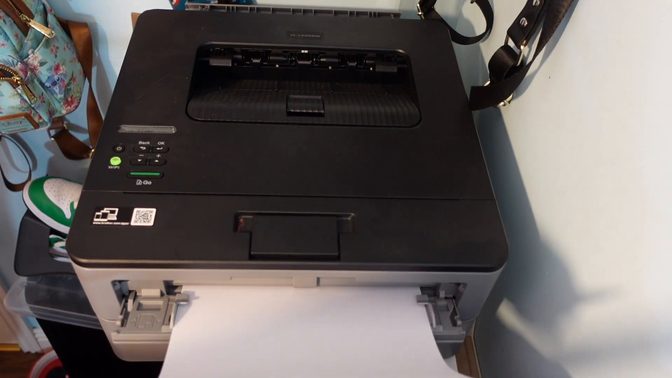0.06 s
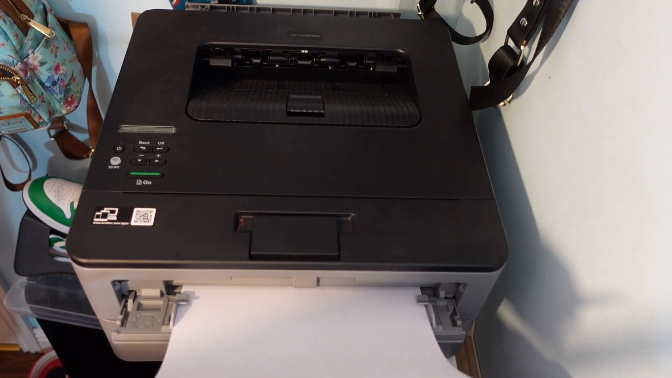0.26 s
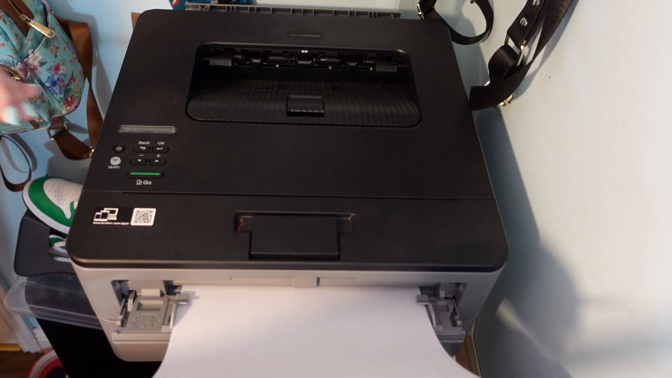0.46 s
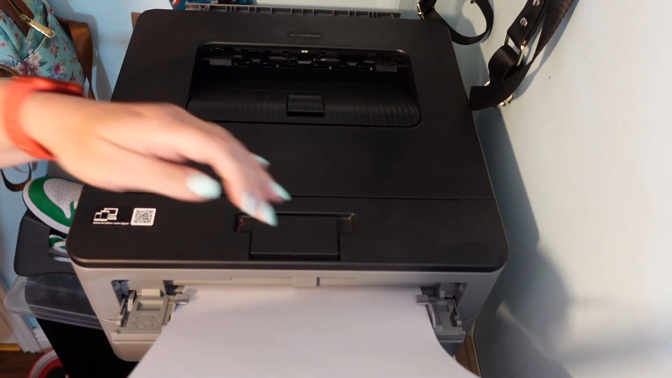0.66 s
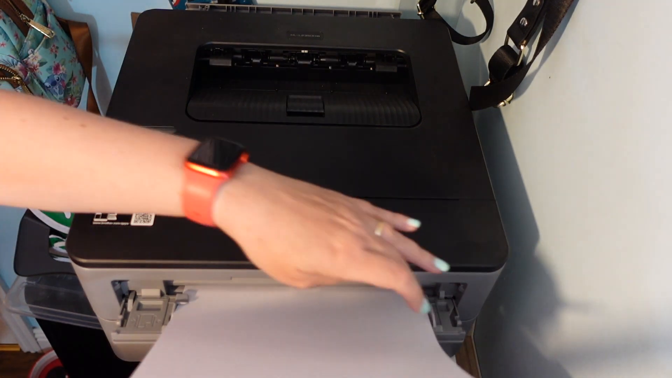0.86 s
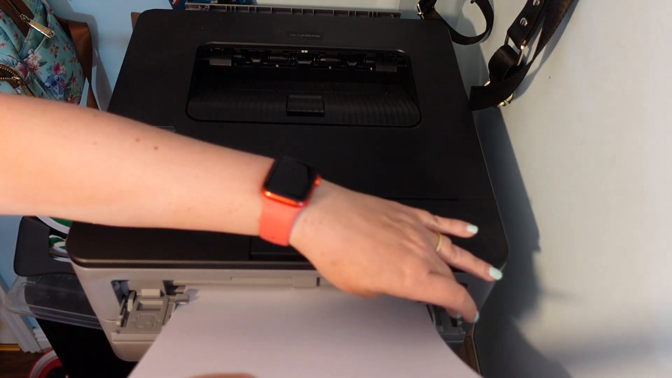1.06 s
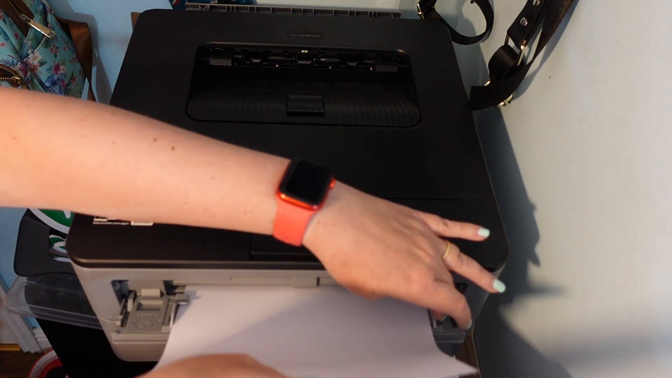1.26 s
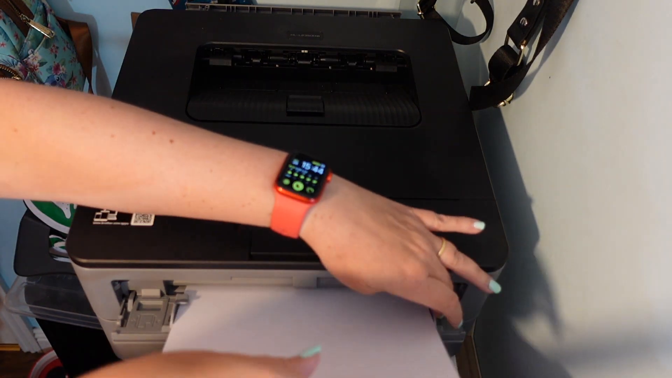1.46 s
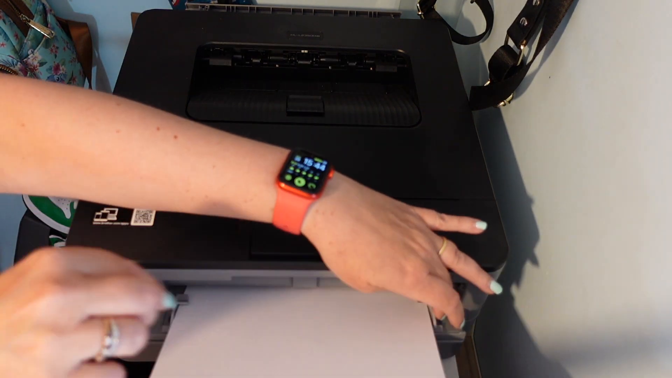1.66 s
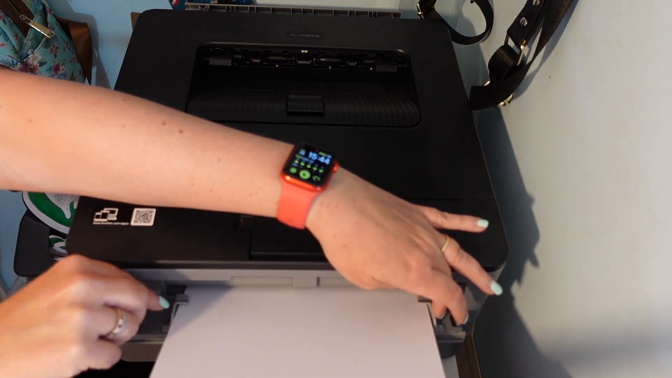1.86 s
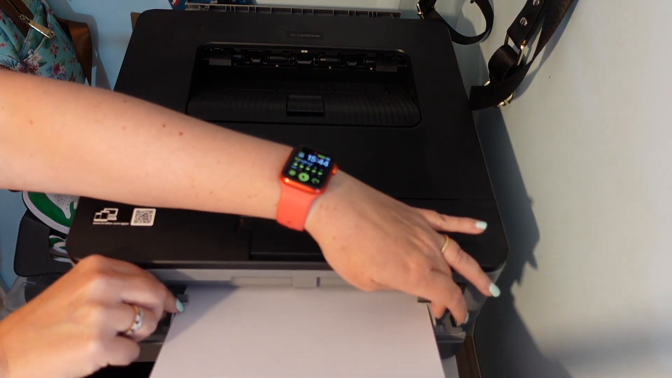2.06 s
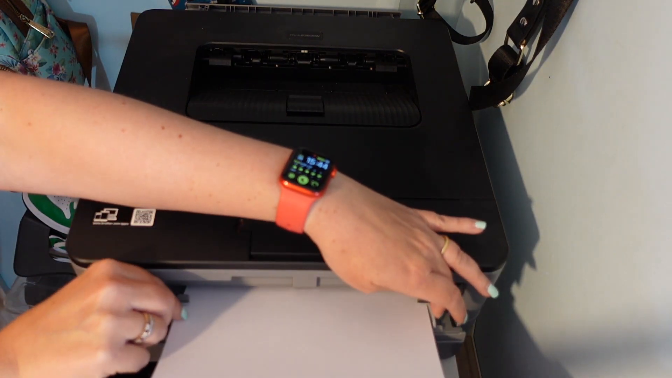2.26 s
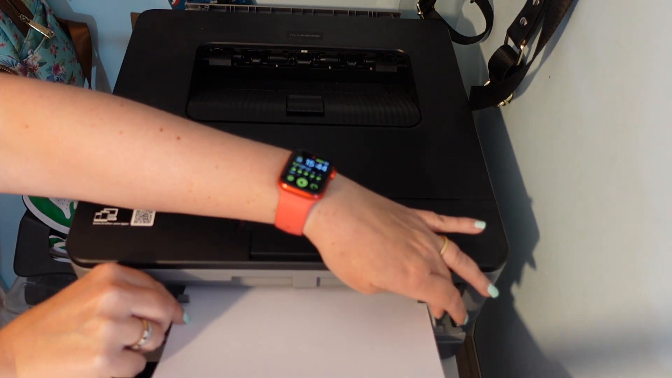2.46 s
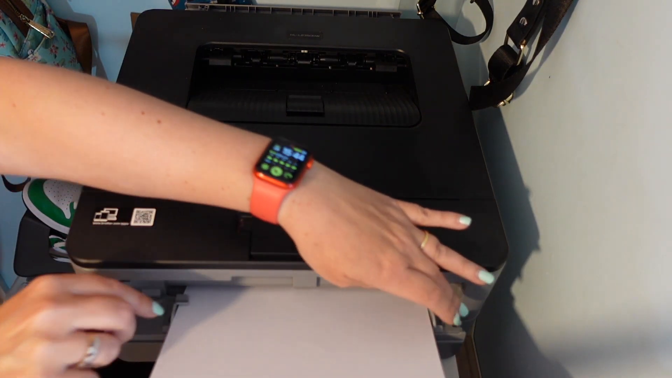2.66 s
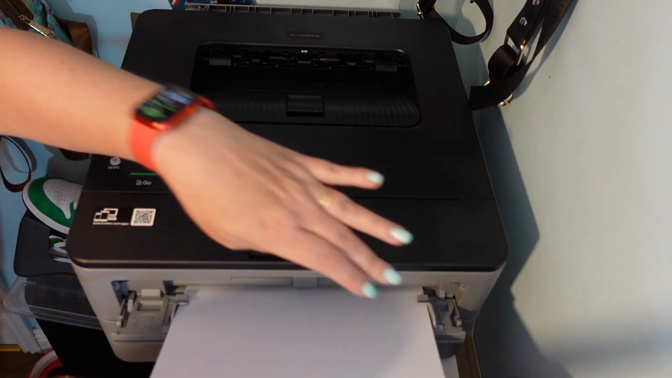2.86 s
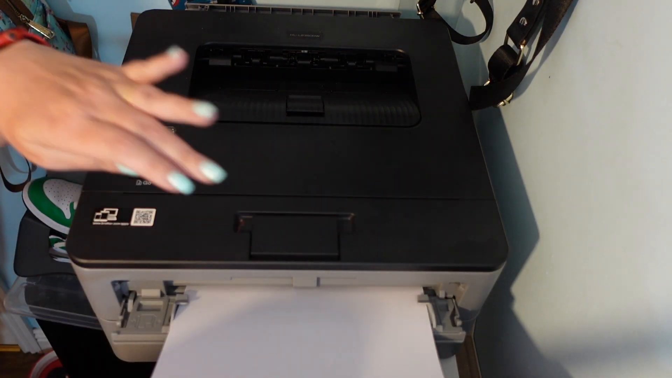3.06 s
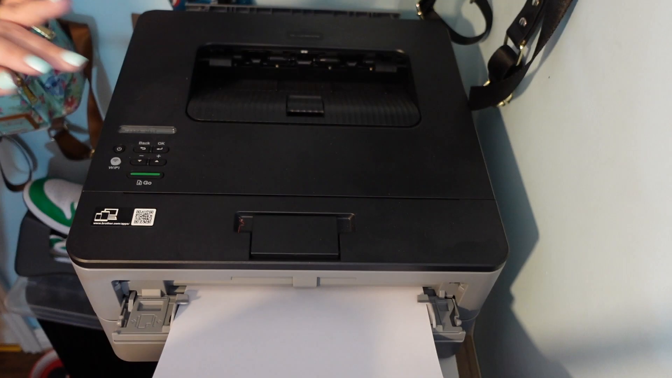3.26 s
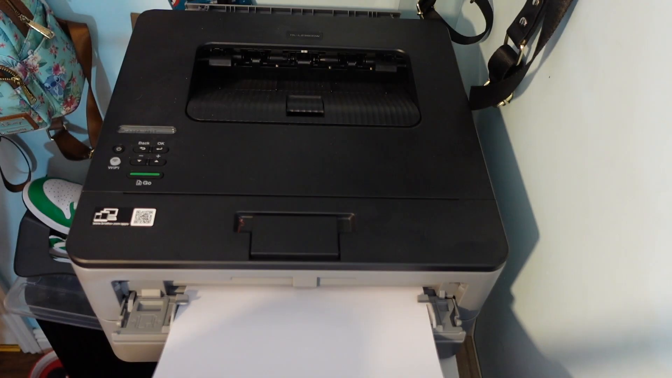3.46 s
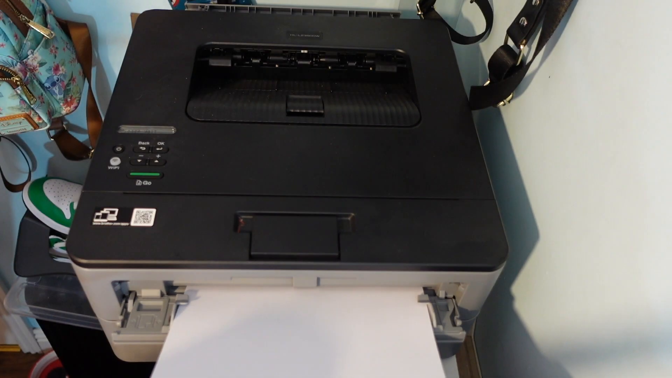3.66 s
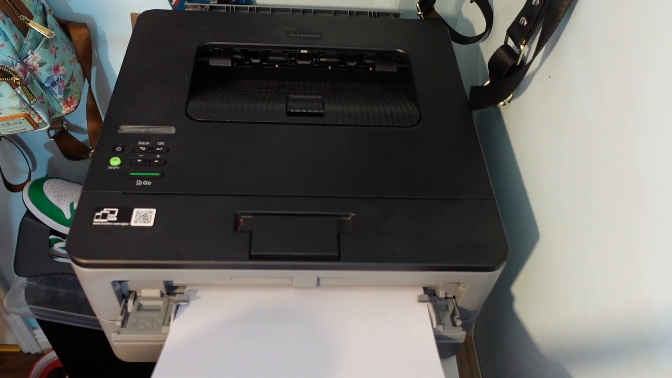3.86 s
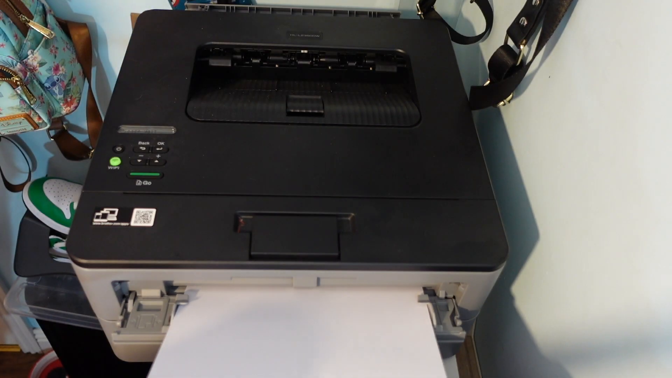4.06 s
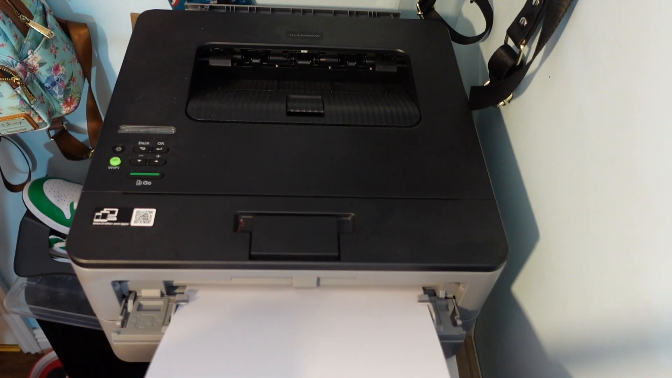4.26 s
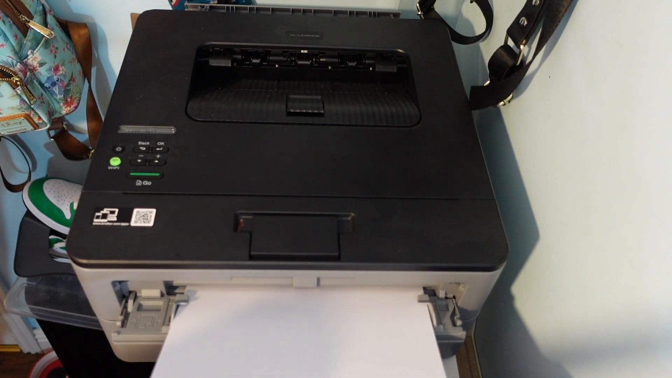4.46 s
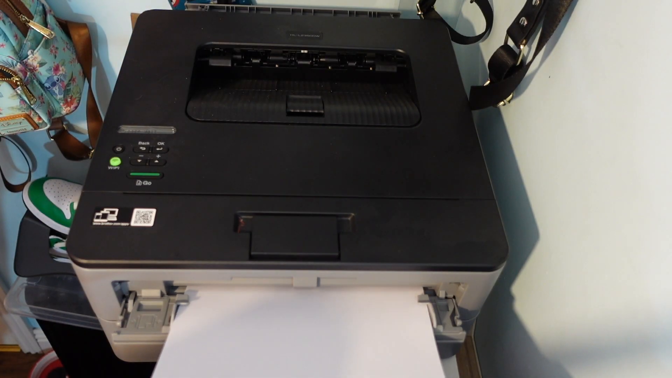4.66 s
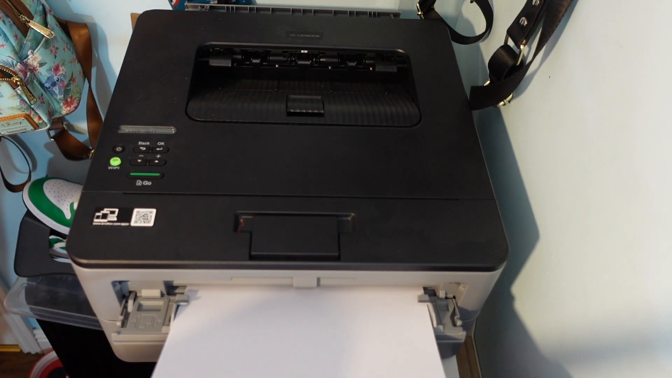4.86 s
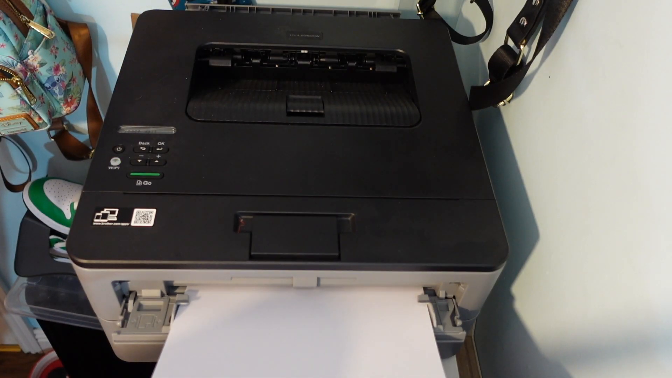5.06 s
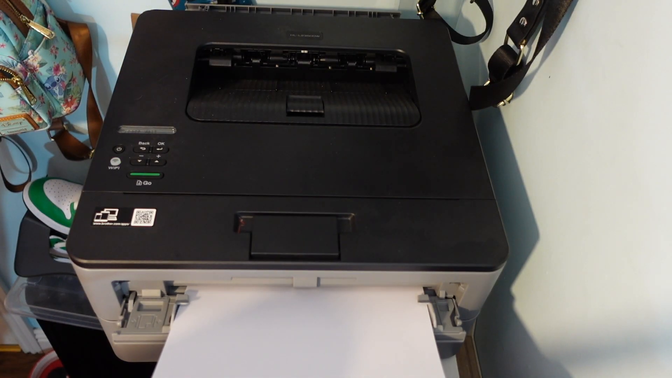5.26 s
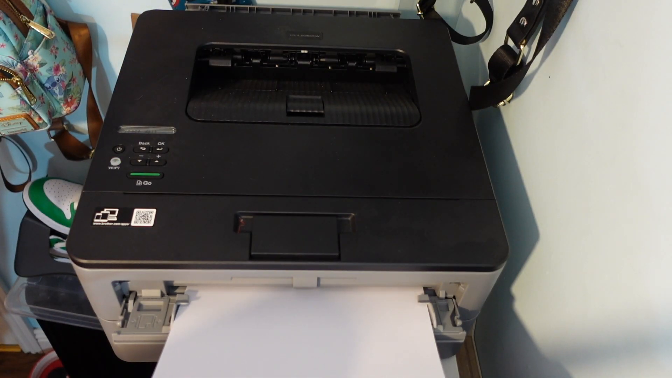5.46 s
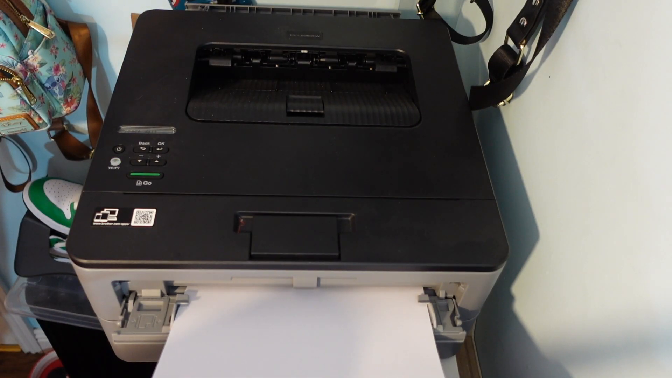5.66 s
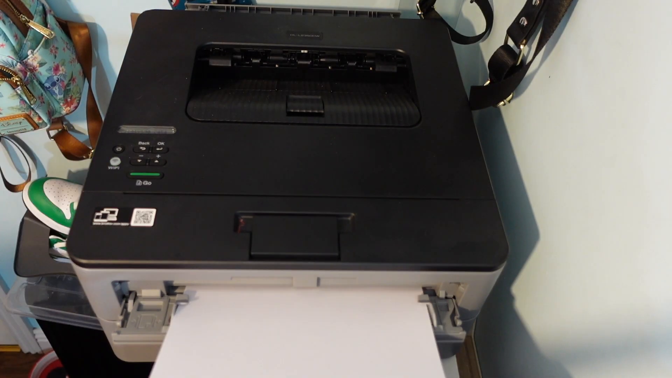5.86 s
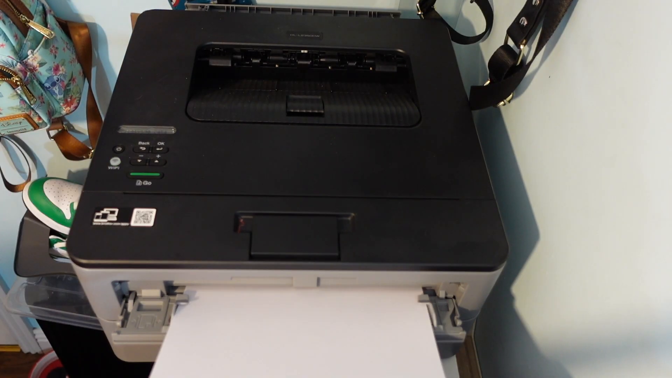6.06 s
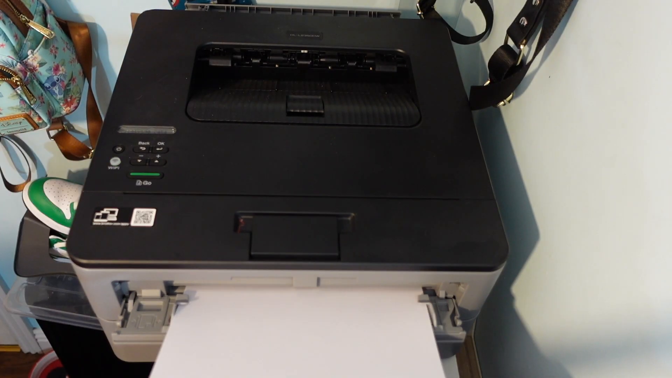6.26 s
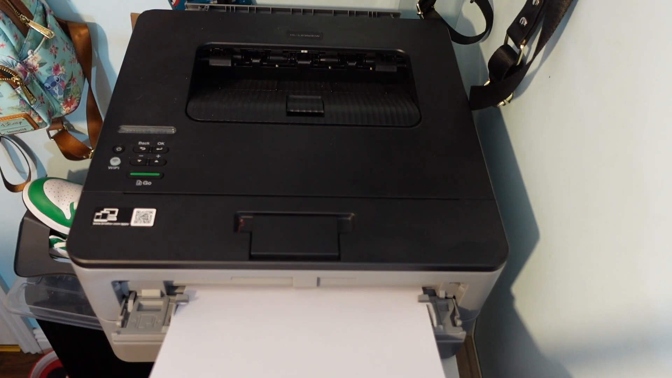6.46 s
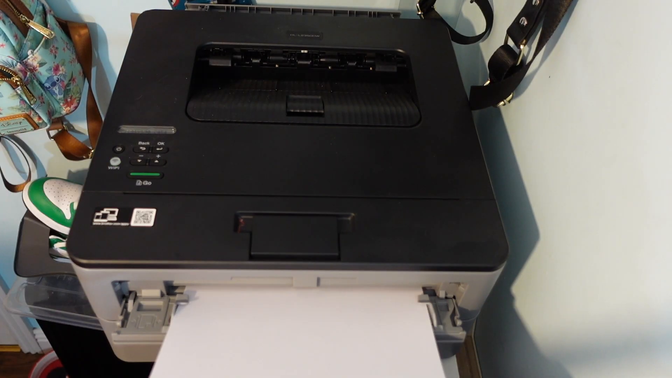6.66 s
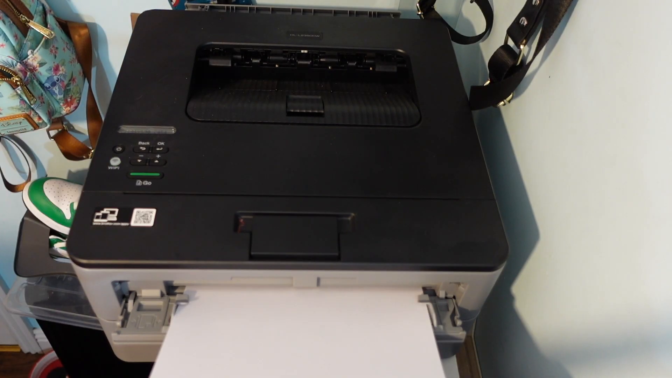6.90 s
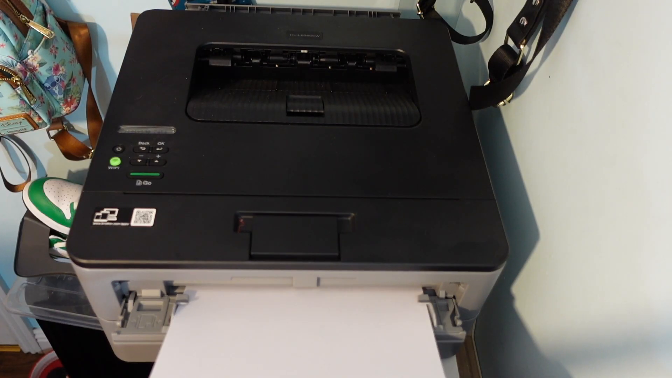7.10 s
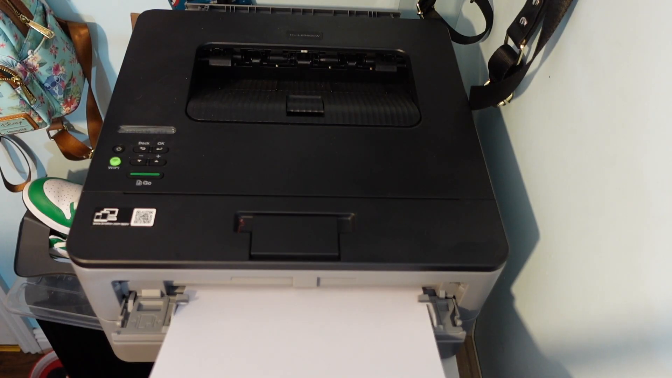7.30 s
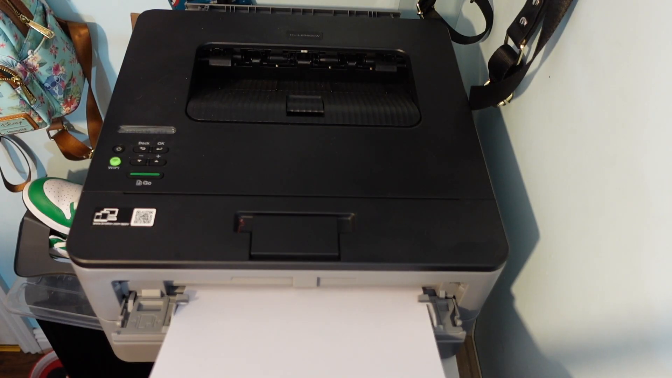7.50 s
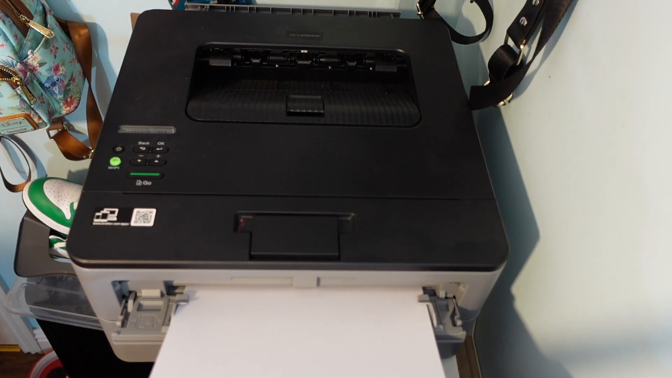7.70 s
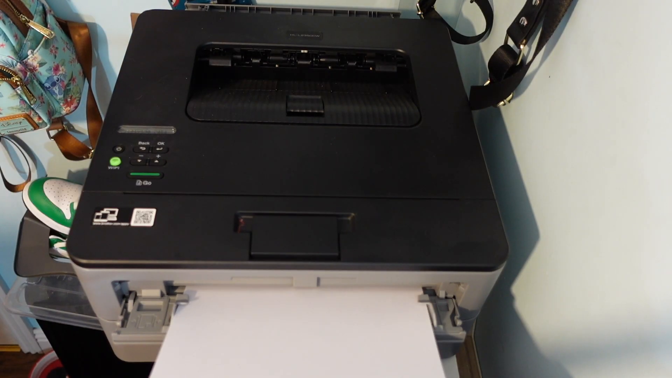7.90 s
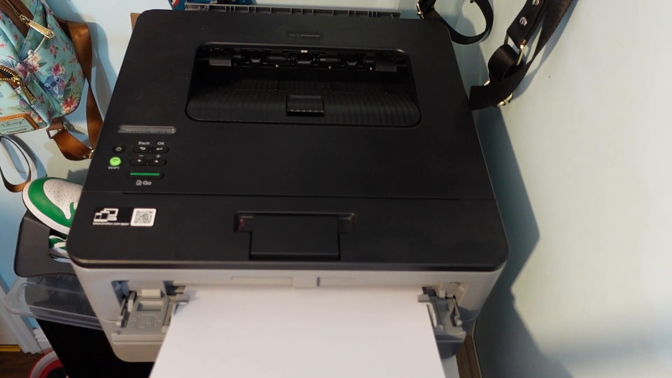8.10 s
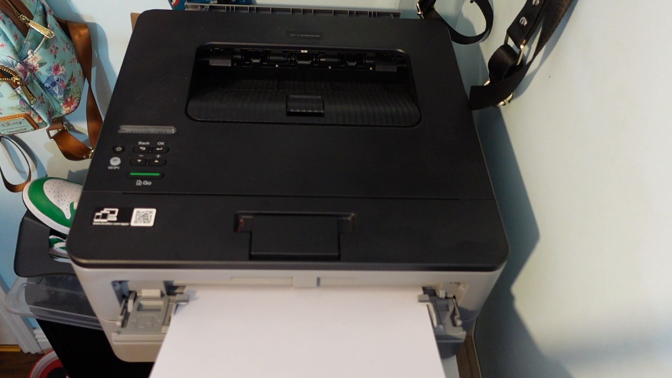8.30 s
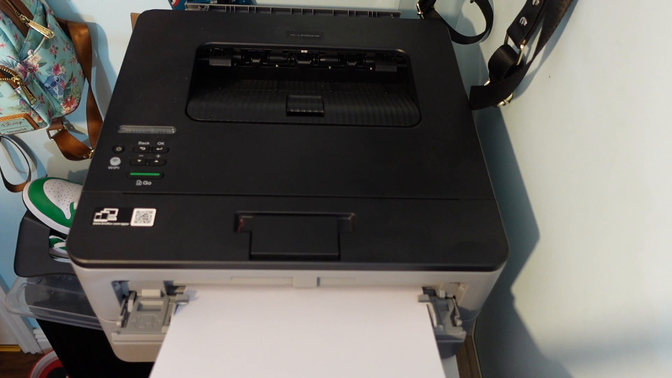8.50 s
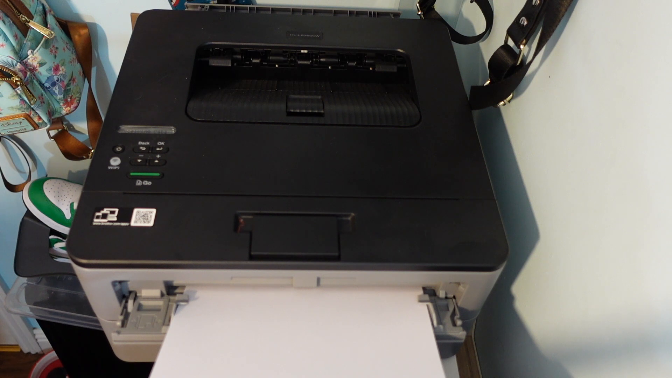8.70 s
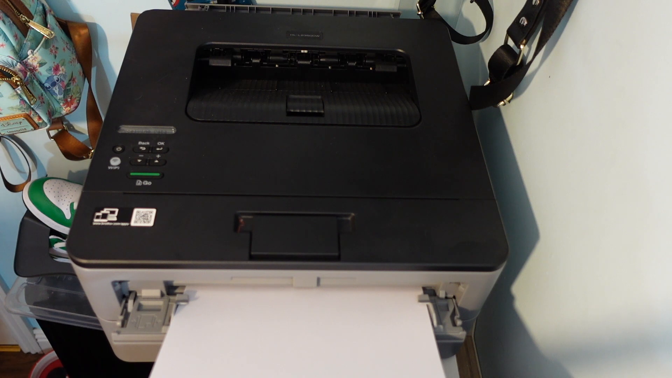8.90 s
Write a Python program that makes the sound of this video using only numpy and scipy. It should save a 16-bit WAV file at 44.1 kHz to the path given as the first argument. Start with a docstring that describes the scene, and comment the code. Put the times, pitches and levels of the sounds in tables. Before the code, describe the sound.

Hard knocks, paper scuffs and plastic clicks at a small printer, then a pause, then gears churn and a whine sweeps up and holds.

```python
"""Loading and starting a printer

Hands push a sheet into the manual feed slot of a desktop laser printer in a small room: knocks and clicks
ring in hard parts, and grainy noise makes the scuffs. A faint drone passes far away, probably an engine gaining
speed: noise, then climbing harmonics. The arm draws back with a soft rustle of filtered noise. Then the printer
starts: gears churn as ticks and hums, the motor drive sizzles as noise in narrow bands, and the mirror scanner
sweeps up to a steady whine made of sines."""
import sys
import numpy as np
from scipy import signal
from scipy.fft import rfft, irfft, next_fast_len
from scipy.io import wavfile

SR = 44100
rng = np.random.default_rng(int(sys.argv[2]) if len(sys.argv) > 2 else 0)


def generate_wav(sig):
    """Save sig (samples, or channels by samples) to the path in sys.argv[1] as 16-bit PCM at SR."""
    pcm = np.round(np.clip(np.atleast_2d(sig).T, -1, 1) * 32767).astype(np.int16)
    wavfile.write(sys.argv[1], SR, pcm)


N = 394254
TIME = np.arange(N) / SR

# Colours of steady sounds, each a curve of (frequency [Hz], relative level per Hz [dB]).
# The quiet room:
ROOM_TONE_COLOUR = [(18, -59), (30, -49), (69, -34), (90, -18), (341, -7.5), (709, -3), (852, -1),
                    (921, -9), (1140, -5), (1550, 0.5), (1720, -5.5), (2130, -8), (2300, -7.5),
                    (4660, -13.5), (15500, -22)]
# The far drone:
DRONE_COLOUR = [(150, -20.5), (300, -13.5), (650, 2.5), (1500, -1.5), (2500, -5.5), (5000, -18)]
# Plastic that is struck or rubbed:
PLASTIC_COLOUR = [(71, -65), (120, -44.5), (415, -9), (676, -9.5), (1020, -9.5), (2110, -2), (3240, -7),
                  (4300, -6.5), (4570, -7.5), (6330, -11), (7160, -16), (7760, -10.5), (8250, -15.5),
                  (15500, -28)]
# Sliding paper:
PAPER_COLOUR = [(180, -58), (300, -30.5), (849, 3.5), (937, -13), (1180, -2), (1510, -2.5), (2070, -3.5),
                (5300, -3), (6570, -21), (7620, -12), (15500, -26)]
# Ticking gear teeth:
GEAR_COLOUR = [(35, -102), (60, -57), (242, -13.5), (291, -9.5), (385, -1), (464, -12), (533, -1.5),
               (627, -7.5), (1260, -2), (1420, -5.5), (2910, -7.5), (3120, -11.5), (6120, -13.5),
               (6560, -17), (15500, -39)]
# Rollers and moving air:
ROLLER_COLOUR = [(88, -64), (150, -40.5), (302, -9.5), (428, -16.5), (519, -3.5), (827, -12.5), (1290, -10),
                 (1870, -8.5), (2060, -7), (2410, -10.5), (4140, -13), (7000, -21), (8330, -22),
                 (8830, -20.5), (15500, -47)]

# Room echo: time to die away by 60 dB.
ROOM_T60_S = 0.46
# Quiet room: the part shared by both microphones, and the part that differs between them.
ROOM_TONE_DB, ROOM_TONE_SIDE_DB = -67.5, -71.0
# Microphone pair: (frequency [Hz], left minus right [dB])
MICROPHONE_LEAN = [(100, 1.5), (400, 0), (1000, 0), (2000, -1.65), (4000, -1), (8000, -2), (12000, 1)]
# Nothing much is heard above this.
CUTOFF_HZ = 15900

# The far drone is loudest at its nearest and has lost 3 dB one passing time from there.
DRONE_DB, NEAREST_S, PASSING_S, DRONE_PATCHY_DB = -64, 2.3, 3.1, 3.5

# Sheet and fingers scuffing over the tray: (peak time [s], level [dB], fall time [s], treble change [dB],
# pitch of the rubbed part [Hz], its resonance [dB])
SCUFF_STROKES = [(0.013, -49.5, 0.069, -3, 2660, -23), (0.581, -47, 0.057, 3, 1600, -11),
                 (0.627, -38.5, 0.026, -22, 1130, -4), (0.715, -55, 0.019, -14, 1340, 0),
                 (1.05, -47.5, 0.15, -8, 2060, -17), (1.13, -39.5, 0.024, -22, 1850, 1),
                 (1.15, -46, 0.014, -18, 2790, 6.5), (1.17, -47, 0.015, -18, 1260, 2.5),
                 (1.264, -39.5, 0.014, -11, 1355, 1), (1.336, -45.5, 0.011, -16, 2320, -8),
                 (1.425, -44.5, 0.032, -14, 2310, -14), (2.07, -65.5, 0.11, 12, 4500, -8),
                 (2.568, -48.5, 0.044, 1.5, 2320, -11), (2.72, -75.5, 0.21, 12.5, 6650, -7),
                 (3.025, -67, 0.092, 11.5, 4500, -18)]
# Unevenness of the grip; share by which the pitch wanders; rise time as a share of the fall time.
SCUFF_CATCH_DB, SCUFF_WANDER, SCUFF_RISE_SHARE = 2.5, .03, 0.32

# Two knocks on something hard that rings: (time [s], level [dB], share of the full ring time [-])
KNOCK_HITS = [(0.0213, -26, 0.84), (0.0839, -30.5, 0.58)]
# What they ring with: (pitch [Hz], level [dB], full time to fall by 60 dB [s])
KNOCK_RINGS = [(350, -22, .05), (535, -12, .26), (710, -9, .035), (930, -9, .04), (1174, -5, .04),
               (1350, -6, .04), (1550, -10, .045), (2340, -15, .07), (2730, -6, .085), (2820, -16, .05),
               (3707, -19, .04), (4600, -14, .035)]
# Rings from this pitch up are started by the clack, lower ones by the thud.
CLACK_ABOVE_HZ = 2000

# Contacts on the plastic tray and casing, in uneven clusters: (time [s], relative level [dB], bass change [dB],
# treble change [dB], pitch of the struck part [Hz], its ring [dB], bounces, 0 or 1 [count])
CONTACTS = [(0.566, -36, -5, -1, 1590, -24, 0), (0.622, -33, -3, -10, 2500, -12, 0),
            (0.645, -32.5, -2, -7, 2390, -13, 0), (0.673, -38, 2, -3, 1090, -12, 0),
            (1.122, -28, -5, -6, 2050, -10, 0), (1.149, -31, -15, -3, 2810, -10, 0),
            (1.2162, -25.5, -1, -3, 1190, -25, 0), (1.262, -30, -8, -4, 1260, -13, 0),
            (1.276, -25.5, -17, -1, 1400, -17, 0), (1.297, -27.5, -4, 2.5, 2340, -15, 0),
            (1.530, -32, 3.5, 5.5, 2310, -20, 0), (1.559, -30, 3, 1, 2110, -18, 0),
            (1.578, -19, 0, 10, 4270, -26, 0), (1.584, -22.5, 8.5, 7.5, 2720, -18, 0),
            (1.592, -18, 5, -2, 1860, -12, 0), (1.612, -28, 4, 1, 1530, -18, 0),
            (1.6427, -28.5, -5, 3, 2940, -15, 0), (1.647, -33, -1, 6.5, 3640, -20, 0),
            (1.663, -28, -4, -1, 2440, -18, 0), (1.673, -26.5, 1, 1.5, 2110, -18, 1),
            (1.743, -41.5, -7, 2, 3650, -23, 0), (1.979, -25.5, -26, -3.5, 2420, -27, 0),
            (1.989, -29.5, -14, -4, 3420, -26, 0), (2.018, -32, 2.5, -10, 1156, -6.5, 1),
            (2.023, -35.5, 8.5, 2, 2100, -24, 0), (2.158, -31.5, -20, -6, 2310, -19, 0),
            (2.174, -29, -17, -12, 2340, -21, 0), (2.197, -35.5, 1, -3, 2260, -11, 0),
            (2.206, -41, -4, 2, 1800, -20, 0), (2.4976, -37.5, -8, 9.5, 3350, -10, 0),
            (2.504, -40, -10, 3, 3100, 1, 0), (2.508, -44.5, -6, -6, 1200, 5, 0),
            (2.564, -36, -14, -10, 2340, -7, 0), (2.571, -35.5, -12, -8, 2480, -2, 0),
            (2.585, -30.5, -5, 3, 4060, -13, 0), (2.600, -38, 4, 0, 1250, -9, 0),
            (2.627, -41, -1, 0, 1180, -12, 0), (2.650, -39, 1, 1, 1200, -12, 0),
            (3.056, -36, -4, 0.5, 1530, -12, 0), (3.086, -41, 2, 2, 2120, -22, 0),
            (3.567, -44.5, -8, -12, 1510, -8, 0), (4.432, -28.5, -5, 3, 1500, -10, 0),
            (4.436, -22.5, -4, -1.5, 3770, -14, 1), (4.464, -31, 1, -2, 2120, -11, 1),
            (4.504, -41.5, 6, 6.5, 3650, -18, 0), (4.529, -44, 2, 0, 2000, -20, 0),
            (7.019, -25, -3, 1.5, 1960, -18, 0), (7.025, -24.5, 1, -2, 2840, -26, 0),
            (7.033, -34.5, -6, 5, 1970, -18, 0)]
# The casing's long rings: (pitch [Hz], level [dB], time to fall by 60 dB [s])
CASING_RINGS = [(362, -35, 0.13), (486.6, -35, 0.14), (673, -26, 0.12), (1410, -20.5, 0.056),
                (1654, -23.5, 0.061), (2350, -33, 0.16), (2913, -17.5, 0.043), (3750, -24, 0.033),
                (7700, -37, .03)]
# A few contacts are followed by one much weaker bounce.
BOUNCE_S, BOUNCE_LOSS_DB = .0155, 11
# Rattle after each crack, and the ring of the struck part.
RATTLE_RISE_S, RATTLE_T60_S, PART_T60_S = 0.00046, 0.058, .045

# The sheet is pushed along the tray: (start [s], end [s], level it grows towards at the end [dB])
SHEET_SLIDES = [(0.567, 1.175, -50), (1.326, 1.598, -56), (2.053, 2.177, -63), (2.6, 2.7, -68)]
SLIDE_ATTACK_S, SLIDE_GROWTH_DB_PER_S, SLIDE_RELEASE_S = 0.06, 21.5, 0.11
# The sheet's own resonances: (pitch [Hz], width [Hz], relative level [dB])
SHEET_RESONANCES = [(797, 25, -13), (1260, 170, 3.5), (2240, 67, 7), (3600, 200, -3), (4650, 97, -1),
                    (5560, 95, 9.5), (7320, 180, -4)]
# They sink while the sheet goes into the slot (the rate is a share of their pitch per second).
SHEET_SINK_FROM_S, SHEET_SINK_S, SHEET_SINK_PER_S = .9, .25, .36

# Speed of the far engine: (time [s], firing rate [Hz])
ENGINE_SPEED = [(2.6, 121), (3.2, 117), (3.55, 128.5), (4.05, 139.5), (4.55, 146.5), (4.95, 150),
                (5.72, 154)]
# What reaches the room of its harmonics: (frequency [Hz], relative level [dB])
ENGINE_PATH = [(120, -49), (265, -12.5), (310, -16.5), (400, -25), (540, -5.5), (600, -9.5), (720, -8.5),
               (1050, -18.5), (1200, -9.5), (1300, 3), (1410, -24), (1510, -2.5), (1600, -8), (1640, 7.5),
               (1690, -15)]
# Harmonics that carry this far: (multiple of the firing rate [-], relative level [dB])
ENGINE_HARMONICS = [(2, -1), (4, 2), (5, -5), (6, -4), (8, 1), (9, -1.5), (10, -2.5), (11, -4), (12, -6),
                    (14, -3)]
# The engine fades in, pulls with wavering tones and lets go quickly.
ENGINE_DB, ENGINE_FROM_S, ENGINE_RISE_S, ENGINE_TO_S, ENGINE_FADE_S = -70.5, 2.5, 0.45, 5.82, 0.12
ENGINE_WAVER_DB, ENGINE_WAVER_HZ = 3, 4

# A soft rustle: (peak time [s], rise width [s], fall width [s], low edge [Hz], high edge [Hz], level [dB])
RUSTLE = (3.5, 0.09, 0.01, 3002, 6500, -65)
# A faint hollow tone swells once: (peak time [s], width [s], pitch [Hz], bandwidth [Hz], level [dB])
HOLLOW_SWELL = (6, 0.7, 844, 72, -72.5)

# The main motor starts: the gears are almost at once at full level, rollers and air follow.
MOTOR_ON_S, GEAR_RISE_S, GEAR_DB = 7.009, .012, -41
ROLLER_RISE_S, ROLLER_DB = 0.34, -40
# Tones of the gear train: (pitch [Hz], relative level [dB])
GEAR_TONES = [(152, -31), (230, -17), (306, -11), (382.6, -5), (454, -12), (535.3, -5), (589.4, -7),
              (690.3, -6), (921.6, -8), (1043, -5), (1269.5, -6), (1298.2, -2), (1357.4, -6), (1644, -4),
              (2279, -8)]

# The drive sizzles from switch-on, a little more at full speed.
DRIVE_ON_S, SIZZLE_DB, SIZZLE_GROWTH_DB = 7.38, -51, 3.5
# The drive current is chopped at this rate: a tone beside the sizzle, and the centre of the surges.
CHOP_HZ, CHOP_DB, CHOP_WIDTH_HZ = 8274, -7.5, 200
# Resonances that the motor drive excites: (pitch [Hz], width [Hz], relative level [dB])
DRIVE_RESONANCES = [(4130, 350, -1.5), (5610, 160, -1), (6480, 170, -22), (7370, 160, -6), (7560, 200, -6),
                    (8244, 210, 5), (9830, 260, -12), (10380, 300, -10.5), (12100, 350, -24),
                    (13900, 550, -20)]
# The drive surges at the kick-off and shortly before lock: (peak time [s], level [dB], width [s])
DRIVE_SURGES = [(7.388, -36, 0.0044), (7.42, -41, 0.018), (8.14, -43, 0.13)]

# The mirror gains speed against drag; its run-up: (time [s], turns per second [1/s])
MIRROR_RUN_UP = [(7.404, 0), (7.46, 47), (7.53, 102.6), (7.6, 156.3), (7.66, 200.5), (7.72, 241.2),
                 (7.8, 292.4), (7.88, 340), (7.97, 389.8), (8.05, 430), (8.14, 474.2), (8.23, 515)]
SPIN_START_S = MIRROR_RUN_UP[0][0]
# Its regulator catches it; it overshoots slightly and settles.
LOCK_S, LOCKED_TURNS_PER_S, OVERSHOOT_TURNS_PER_S, SETTLE_S = 8.225, 507, 7.5, .25
# The rotor rasps as it gets going: (peak time [s], width [s], pitch [Hz], bandwidth [Hz], level [dB])
ROTOR_RASP = (7.465, 0.0266, 1750, 1100, -42)
# The coils sing less as the current falls with speed, and stop at lock.
COIL_DB, COIL_SAG_DB, COIL_FADE_S = -34, 19, 0.035
COIL_FLICKER_DB, COIL_JITTER_HZ, COIL_ECHO_DB = 3, 42, -6
# Coil tones: (multiple of the turn rate [-], relative level at full speed [dB], power of growth with speed [-])
COIL_TONES = [(18, 5.5, 3.5), (36, -3, 0), (54, -10, 1), (72, -7, 1.3)]
# How the housing passes those tones: (frequency [Hz], level change [dB])
HOUSING_PATH = [(900, -14), (1800, 3), (2500, -9), (3300, -5), (4150, 2), (4700, -6), (5350, 1), (5900, -8),
                (6400, -3), (7000, -9), (7600, -3), (8250, 7), (8700, -12), (9200, -11), (9700, 0),
                (10350, 2), (11200, -14), (12000, -11), (13000, -20), (14000, -5), (15300, -11)]
# A fluttering tone grows with the mirror's speed.
FLUTTER_HZ, FLUTTER_WIDTH_HZ, FLUTTER_PATCHY_DB, FLUTTER_DB = 4165, 110, 3.5, -53
# The air whine grows as a power of the speed, up to this level.
MIRROR_FACETS, WHINE_DB, WHINE_POWER = 4, -40, 8


def from_db(db):
    """Turns decibels into a multiplier."""
    return 10 ** (np.asarray(db) / 20)


def rms_one(x):
    """Scales a sound to an average strength (rms) of 1."""
    return x / np.sqrt(np.mean(x ** 2) + 1e-20)


def at_hz(points, hz):
    """Reads a table on a log-frequency axis."""
    f, value = np.transpose(points)
    return np.interp(np.log(np.maximum(hz, 1)), np.log(f), value)


def since(s):
    """Time elapsed since a moment; zero before it."""
    return np.maximum(TIME - s, 0)


def settle(s, lag):
    """Rises from 0 at a moment towards 1, with a time constant."""
    return 1 - np.exp(-since(s) / lag)


def die_away(t, t60):
    """Fades by 60 dB in the time t60."""
    return np.exp(-np.log(1000) * t / t60)


def swell(s, width):
    """A smooth bell-shaped rise and fall around a moment."""
    return np.exp(-.5 * ((TIME - s) / width) ** 2)


def drift(rate):
    """Slow random wandering with spread 1; a higher rate wanders faster."""
    r = np.exp(-80 * np.pi * rate / SR)
    # made at every 40th sample, with a lead-in thrown away, then joined by straight lines
    steps = rng.standard_normal(N // 40 + 2002)
    slow = signal.lfilter([1], [1, -2 * r, r * r], steps)[2000:]
    return np.interp(np.arange(N) / 40, np.arange(len(slow)), rms_one(slow))


def butter(x, hz, kind, order=2):
    """Keeps the low, high or middle frequencies of a sound."""
    return signal.sosfilt(signal.butter(order, hz, kind, fs=SR, output="sos"), x)


def colour(x, spectrum, size=4096):
    """Filters without echo ahead of time to a given spectrum; white noise keeps its power."""
    gain = rms_one(from_db(at_hz(spectrum, np.arange(size // 2 + 1) * SR / size)))
    # folding the cepstrum puts all of the filter's response after the input
    cepstrum = irfft(np.log(gain))
    cepstrum[1:size // 2] *= 2
    cepstrum[size // 2 + 1:] = 0
    return signal.oaconvolve(x, irfft(np.exp(rfft(cepstrum))))[:len(x)]


def resonance(x, hz, width):
    """Lets one band through, with gain 1 at its top."""
    r = np.exp(-np.pi * width / SR)
    feed = np.array([1, 0, -1]) * (1 - r * r) / 2
    return signal.lfilter(feed, [1, -2 * r * np.cos(2 * np.pi * hz / SR), r * r], x)


def ring(clicks, hz, t60):
    """Each click of height 1 sets a dying sine of height 1 ringing."""
    r, w = np.exp(-np.log(1000) / (t60 * SR)), 2 * np.pi * hz / SR
    # the tiny offset keeps the filter from slowing down on near-zero numbers
    return signal.lfilter([0, np.sin(w)], [1, -2 * r * np.cos(w), r * r], clicks + 1e-18)


def sine(hz):
    """A tone of rms 1 that follows a pitch curve from a random phase."""
    return np.sqrt(2) * np.sin(2 * np.pi * (np.cumsum(hz) / SR + rng.random()))


def noise_band(hz, width):
    """Noise passed twice through one resonance: a fluttering tone of rms 1."""
    return rms_one(resonance(resonance(rng.standard_normal(N), hz, width), hz, width))


def grains(per_s, spread_db, hiss):
    """Tiny contacts of uneven size at random moments, over smooth hiss; rms 1."""
    happens = rng.random(N) < per_s / SR
    sign = rng.choice([-1, 1], N)
    strength = from_db(spread_db * np.clip(rng.standard_normal(N), -2, 2))
    return rms_one(rms_one(happens * sign * strength) + hiss * rng.standard_normal(N))


def bend(x, ratio):
    """Shifts every pitch in a sound by a ratio that changes in time, by reading it faster or slower."""
    return np.interp(np.cumsum(ratio) % N, np.arange(N), x)


def room(x, wet_db, wall_hz=6000, first_echo_s=.004):
    """Echoes of a small furnished room blur into one dying tail, duller than the sound itself."""
    t = TIME[:SR // 2]
    noise = butter(rng.standard_normal(len(t)), wall_hz, "low", order=1)
    tail = noise * die_away(t, ROOM_T60_S) * (t > first_echo_s)
    return from_db(wet_db) * signal.oaconvolve(x, tail / np.sqrt(np.sum(tail ** 2)))[:N]


def room_tone(db):
    """The quiet room: steady coloured noise."""
    return from_db(db) * colour(rng.standard_normal(N), ROOM_TONE_COLOUR)


def far_drone():
    """A dull rush from far away that swells and fades with distance; its bands come and go."""
    nearness = 1 / np.hypot(1, (TIME - NEAREST_S) / PASSING_S)
    rush = colour(rng.standard_normal(N), DRONE_COLOUR)
    patches = sum((from_db(DRONE_PATCHY_DB * drift(2)) - 1) * resonance(rush, hz, hz / 8)
                  for hz in np.geomspace(300, 2400, 14))
    return from_db(DRONE_DB) * nearness * rms_one(rush + patches)


def scuffs(treble_hz=4000, part_width_hz=70):
    """Short stick-slip strokes: dense grains excite the plastic; each rubbed part sings at a wandering pitch."""
    slips = grains(per_s=1000, spread_db=1.5, hiss=0.91) * from_db(SCUFF_CATCH_DB * drift(67))
    wander = 1 + SCUFF_WANDER * drift(10)
    rub = colour(slips, PLASTIC_COLOUR)
    treble = butter(rub, treble_hz, "high", order=1)
    out = np.zeros(N)
    for s, db, fall, treble_db, part_hz, part_db in SCUFF_STROKES:
        distance = np.maximum((s - TIME) / (SCUFF_RISE_SHARE * fall), (TIME - s) / fall)
        stroke = np.exp(-np.minimum(distance, 20))
        part = from_db(part_db) * rms_one(bend(resonance(slips, part_hz, part_width_hz), wander))
        out += from_db(db) * stroke * (rub + (from_db(treble_db) - 1) * treble + part)
    return butter(out, 480, "high")


def knocks(crack_db=-7.5, crack_s=0.2, crack_hz=5000, clack_lag_s=0.0034, damping_s=0.012):
    """A dull thud rings the low pitches, a hard clack just after it the high ones; the last knock damps the part."""
    out = np.zeros(N)
    for s, db, ring_share in KNOCK_HITS:
        thud, clack = np.zeros((2, N))
        thud[round(s * SR)] = from_db(db)
        clack[round((s + clack_lag_s) * SR)] = from_db(db)
        for k, (hz, mode_db, t60) in enumerate(KNOCK_RINGS):
            blow = thud if hz < CLACK_ABOVE_HZ else clack
            level = from_db(mode_db + rng.normal(0, 1.0))
            # neighbouring rings start in opposite directions
            out += ring(blow, hz, t60 * ring_share) * level * (-1) ** k
        dying = (TIME >= s) * die_away(since(s), crack_s)
        crack = butter(dying * rng.standard_normal(N) + 1e-18, [300, crack_hz], "band")
        out += from_db(db + crack_db) * crack
    # the last knock seats the part, which soon stops it ringing
    damping = np.exp(-since(KNOCK_HITS[-1][0] + damping_s) / damping_s)
    return butter(out * damping, 260, "high", order=3)


def touches():
    """Lists every contact; a few are followed by one much weaker bounce."""
    found = []
    for s, db, bass_db, treble_db, part_hz, ring_db, bounces in CONTACTS:
        found.append((s, db, bass_db, treble_db, part_hz, ring_db))
        if bounces:
            found.append((s + BOUNCE_S, db - BOUNCE_LOSS_DB, bass_db, treble_db, part_hz, ring_db))
    return found


def tray(rattle_db=-5.0, crack_db=-6.0, bass_hz=900, treble_hz=4000, part_width_hz=220, size=8192):
    """Each contact is a crack and a dying rattle, coloured by the struck part; that part and the casing ring on."""
    t = np.arange(size) / SR
    force, parts = np.zeros((2, N + size))
    contacts = touches()
    for s, db, bass_db, treble_db, part_hz, ring_db in contacts:
        rattle_shape = (1 - np.exp(-t / RATTLE_RISE_S)) * die_away(t, RATTLE_T60_S)
        burst = from_db(rattle_db) * rng.standard_normal(size) * rattle_shape
        burst[0] += from_db(crack_db)
        bass = (from_db(bass_db) - 1) * butter(burst, bass_hz, "low", order=1)
        treble = (from_db(treble_db) - 1) * butter(burst, treble_hz, "high", order=1)
        burst = burst + bass + treble + resonance(burst, part_hz, part_width_hz)
        start = round(s * SR)
        force[start:start + size] += from_db(db - 4.5) * burst
        part_ring = np.sin(2 * np.pi * part_hz * t) * die_away(t, PART_T60_S)
        parts[start:start + size] += from_db(db + ring_db) * part_ring
    out = colour(force[:N], PLASTIC_COLOUR) + parts[:N]
    s, db, bass_db = np.transpose(contacts)[:3]
    # each blow excites every casing ring a little differently
    chance_db = rng.normal(0, 1.9, (len(s), len(CASING_RINGS)))
    for k, (hz, mode_db, t60) in enumerate(CASING_RINGS):
        blows = np.zeros(N)
        blow_db = db + mode_db + chance_db[:, k] + bass_db * (hz < bass_hz)
        blows[np.round(s * SR).astype(int)] = from_db(blow_db)
        out += ring(blows, hz, t60)
    return butter(out, 313, "high", order=3)


def paper(sheet_db=-3.5):
    """Fibres catch and slip as the sheet slides, louder the further it goes; its resonances sink as it goes in."""
    level = np.zeros(N)
    for start, end, db in SHEET_SLIDES:
        growth = from_db(db - SLIDE_GROWTH_DB_PER_S * np.maximum(end - TIME, 0))
        level += settle(start, SLIDE_ATTACK_S) * growth * np.exp(-since(end) / SLIDE_RELEASE_S)
    slips = grains(per_s=3000, spread_db=3, hiss=.6) * from_db(1.5 * drift(25))
    sheet = sum(from_db(db + 3 * drift(8)) * resonance(slips, hz, width)
                for hz, width, db in SHEET_RESONANCES)
    tuning = np.exp(-SHEET_SINK_PER_S * np.clip(TIME - SHEET_SINK_FROM_S, 0, SHEET_SINK_S))
    sheet = from_db(sheet_db) * rms_one(bend(sheet, tuning))
    return level * rms_one(colour(slips, PAPER_COLOUR) + sheet)


def engine_tones():
    """Wavering harmonics follow the far engine's speed and light up as they cross resonances on the way."""
    firing_hz = np.interp(TIME, *np.transpose(ENGINE_SPEED))
    fade_in = (TIME - ENGINE_FROM_S) / ENGINE_RISE_S
    fade_out = (ENGINE_TO_S - TIME) / ENGINE_FADE_S
    tones = np.zeros(N)
    for k, db in ENGINE_HARMONICS:
        path_db = at_hz(ENGINE_PATH, k * firing_hz)
        level = from_db(ENGINE_DB + db + path_db + ENGINE_WAVER_DB * drift(7.4))
        tones += level * sine(k * firing_hz + ENGINE_WAVER_HZ * drift(19.8))
    return np.clip(np.minimum(fade_in, fade_out), 0, 1) * tones


def brush():
    """A soft airy rustle of band-limited noise, probably the arm brushing against clothing as it draws back."""
    s, rise_s, fall_s, low_hz, high_hz, db = RUSTLE
    shape = swell(s, np.where(TIME < s, rise_s, fall_s))
    air = butter(rng.standard_normal(N), [low_hz, high_hz], "band", order=1)
    return from_db(db) * shape * rms_one(butter(air, 11000, "low"))


def hollow_tone():
    """A narrow band of far noise that swells and fades."""
    s, width, hz, band_hz, db = HOLLOW_SWELL
    return from_db(db) * swell(s, width) * noise_band(hz, band_hz)


def gear_train(mesh_db=-12.5, squeal_hz=6700, squeal_db=-16.0):
    """Teeth tick together; wheel pairs hum at their mesh rates, wavering with load; the motor squeals faintly."""
    teeth = colour(grains(per_s=2500, spread_db=1.5, hiss=0.58), GEAR_COLOUR)
    load = drift(4.3)
    hum = np.zeros(N)
    for hz, db in GEAR_TONES:
        pitch = hz * (1 + .001 * load + .003 * drift(30))
        hum += from_db(db - 1 + 3 * drift(9)) * sine(pitch)
    squeal = noise_band(squeal_hz, 160) * from_db(2.0 * drift(10.0))
    churn = teeth + from_db(mesh_db) * hum + from_db(squeal_db) * squeal
    return settle(MOTOR_ON_S, GEAR_RISE_S) * from_db(GEAR_DB) * churn


def rollers():
    """Rollers and air make a dense, nearly smooth rush that builds up after the motor starts."""
    rush = colour(grains(per_s=4000, spread_db=0.5, hiss=0.88), ROLLER_COLOUR)
    return settle(MOTOR_ON_S, ROLLER_RISE_S) * from_db(ROLLER_DB + 0.18 * drift(5.6)) * rush


def mirror_turns():
    """Turns per second of the scanner mirror: run-up, then regulated speed."""
    run_up = np.interp(TIME, *np.transpose(MIRROR_RUN_UP))
    held = LOCKED_TURNS_PER_S + OVERSHOOT_TURNS_PER_S * np.exp(-since(LOCK_S) / SETTLE_S)
    return np.minimum(run_up, held)


def motor_body(x):
    """The steep resonances of the motor and its steel plate."""
    return sum(from_db(db) * resonance(resonance(x, hz, width), hz, width)
               for hz, width, db in DRIVE_RESONANCES)


def drive_sizzle(speed):
    """The chopped drive current shakes the motor body into a sizzle; surges sound only around the chopping rate."""
    chopper = from_db(CHOP_DB) * sine(CHOP_HZ * (1 + .005 * drift(70)))
    body = rms_one(motor_body(rng.standard_normal(N)))
    sizzle = from_db(SIZZLE_DB + SIZZLE_GROWTH_DB * speed) * (body + chopper)
    surge_level = sum(from_db(db) * np.exp(-np.abs(TIME - s) / width) for s, db, width in DRIVE_SURGES)
    surges = surge_level * (noise_band(CHOP_HZ, CHOP_WIDTH_HZ) + chopper)
    return (TIME > DRIVE_ON_S) * from_db(2.5 * drift(25)) * (sizzle + surges)


def coil_song(turns, speed, wobble=0.17):
    """Coils sing roughly while the mirror gains speed, flaring and fading through the housing's resonances."""
    ramps = np.minimum(TIME - SPIN_START_S, LOCK_S - TIME) / COIL_FADE_S
    current = from_db(COIL_DB - COIL_SAG_DB * speed) * np.clip(ramps, 0, 1)
    tones = np.zeros(N)
    for k, db, growth in COIL_TONES:
        level = from_db(db + at_hz(HOUSING_PATH, k * turns) + COIL_FLICKER_DB * drift(60))
        tone = sine(k * turns + COIL_JITTER_HZ * drift(200))
        tones += level * speed ** growth * tone * (k * turns < CUTOFF_HZ)
    # the rotor is slightly off centre, so the tones throb once per turn
    coils = tones * current * (1 + wobble * sine(turns))
    # the housing rings on behind the gliding tones
    return coils + room(coils, wet_db=COIL_ECHO_DB)


def kick_off(turns):
    """The first coarse steps of the rotor shake the motor plate: a short rough rasp."""
    s, width, hz, band_hz, db = ROTOR_RASP
    steps = 1 + sine(6 * turns) / 2
    return from_db(db) * swell(s, width) * noise_band(hz, band_hz) * steps


def flutter_tone(speed):
    """A narrow band of noise flutters, stronger as the mirror turns faster."""
    return from_db(FLUTTER_DB + FLUTTER_PATCHY_DB * drift(12)) * speed * noise_band(FLUTTER_HZ, FLUTTER_WIDTH_HZ)


def scanner():
    """The drive, coils, rotor and fluttering tone of the mirror scanner share one speed curve."""
    turns = mirror_turns()
    speed = turns / LOCKED_TURNS_PER_S
    return drive_sizzle(speed) + coil_song(turns, speed) + kick_off(turns) + flutter_tone(speed)


def mirror_whine(octave_db=-17):
    """The mirror's facets whine in the air: the tone glides in with speed, then holds."""
    turns = mirror_turns()
    level = from_db(WHINE_DB + .6 * drift(14)) * (turns / LOCKED_TURNS_PER_S) ** WHINE_POWER
    facet_hz = MIRROR_FACETS * turns
    return level * (sine(facet_hz) + from_db(octave_db) * sine(2 * facet_hz))


def scene():
    """Adds all sounds and their room echoes; only diffuse sound differs between the two microphones."""
    clacks = knocks()
    printer = gear_train() + rollers() + scanner()
    near = scuffs() + tray() + paper() + brush() + printer
    far = far_drone() + engine_tones() + hollow_tone()
    echoes = room(clacks, wet_db=-17.5) + room(near, wet_db=-14.5)
    mid = clacks + near + echoes + mirror_whine() + far + room_tone(ROOM_TONE_DB)
    diffuse = room_tone(ROOM_TONE_SIDE_DB) + from_db(-4.5) * far_drone()
    side = room(near, wet_db=-24.0) + butter(diffuse, 4400, "low", order=1)
    return butter(np.array([mid + side, mid - side]), 57, "high")


def record(dry):
    """The right microphone hears the upper middle a little louder; the top is cut."""
    size = next_fast_len(N)
    lean_db = at_hz(MICROPHONE_LEAN, np.arange(size // 2 + 1) * SR / size)
    gains = from_db(np.array([lean_db, -lean_db]) / 2)
    heard = irfft(rfft(dry, size) * gains, size)[:, :N]
    return signal.sosfilt(signal.ellip(10, .1, 70, CUTOFF_HZ, fs=SR, output="sos"), heard)


dry = scene()
out = record(dry)
generate_wav(out)
```